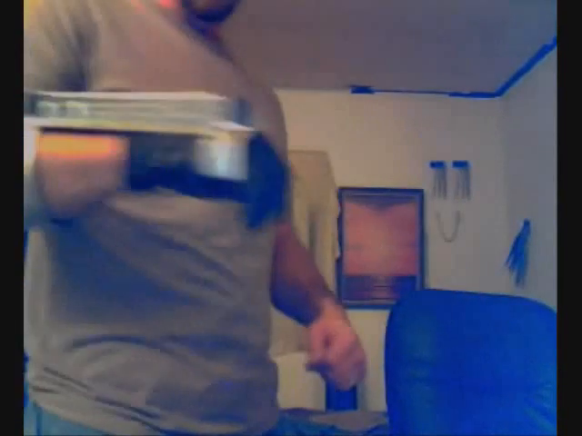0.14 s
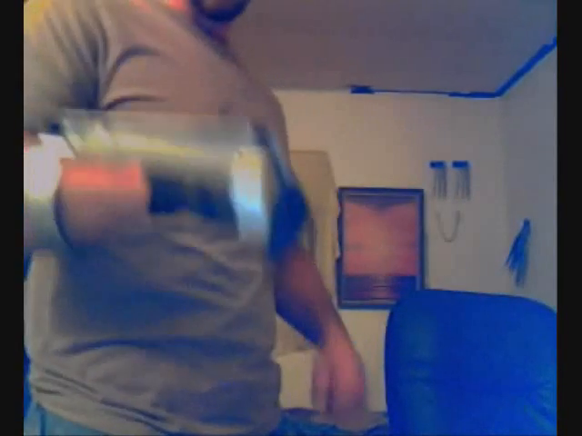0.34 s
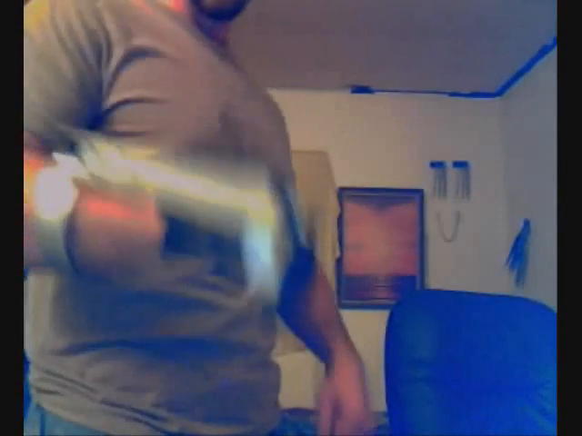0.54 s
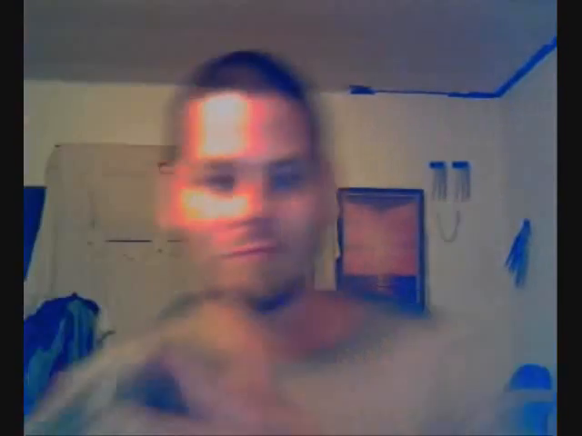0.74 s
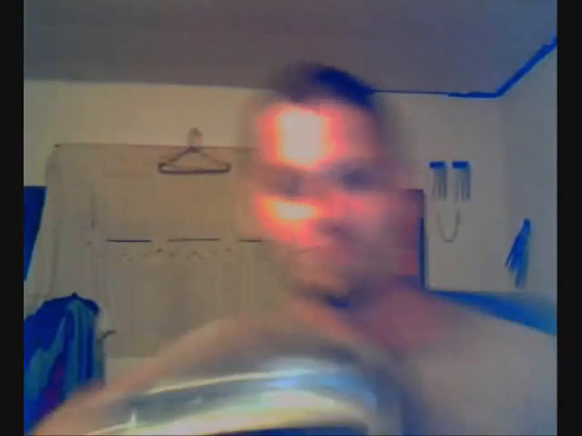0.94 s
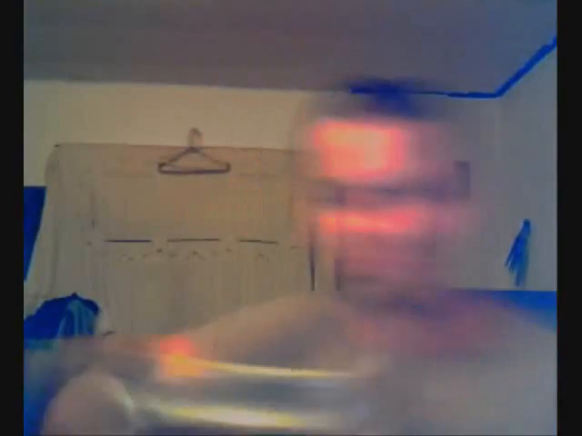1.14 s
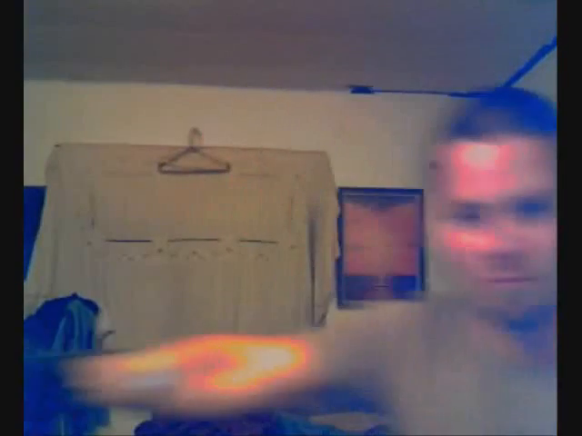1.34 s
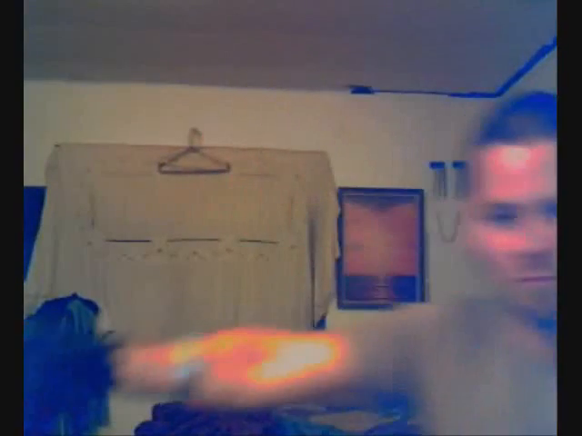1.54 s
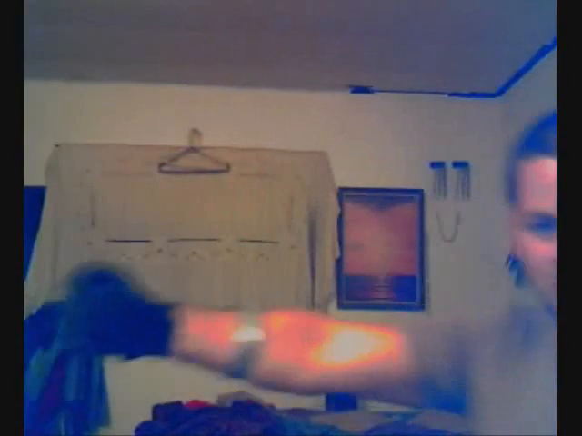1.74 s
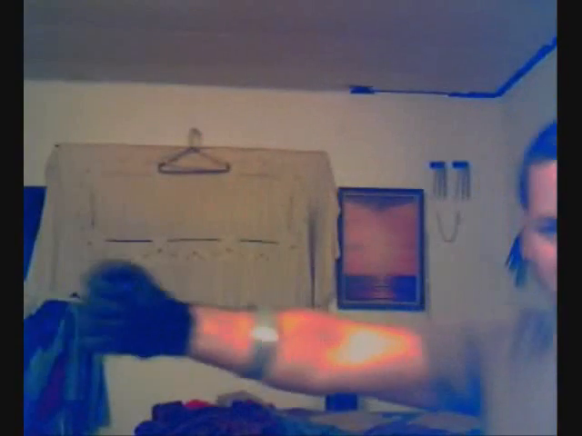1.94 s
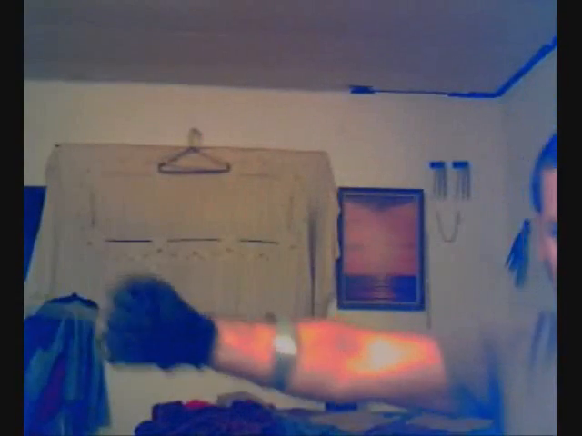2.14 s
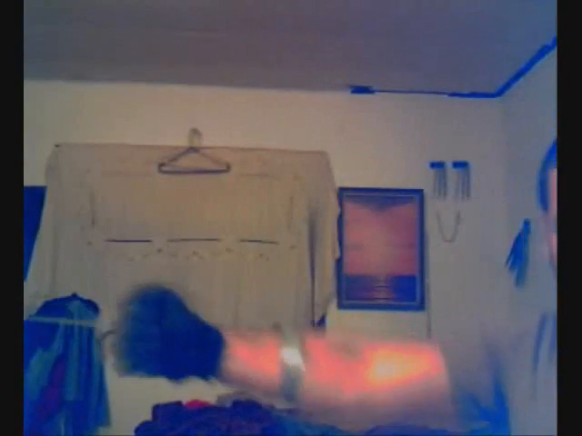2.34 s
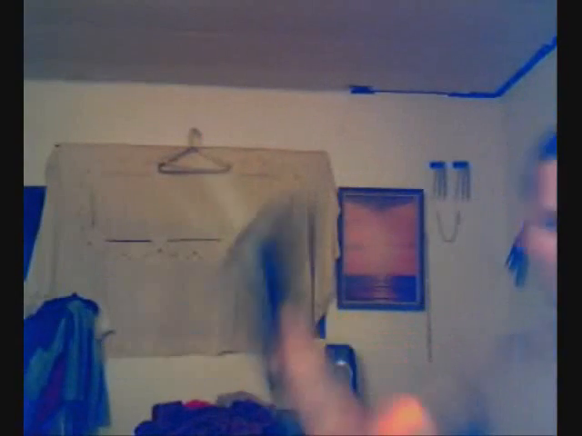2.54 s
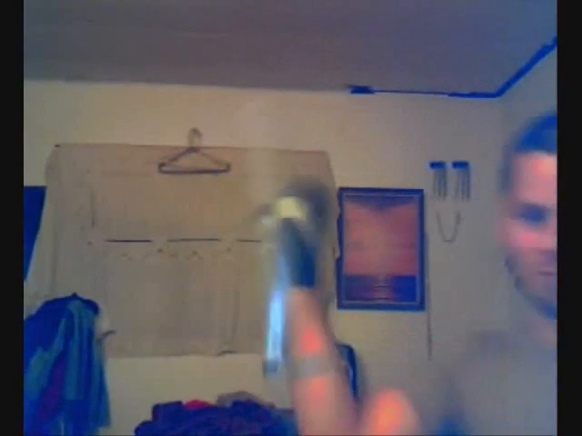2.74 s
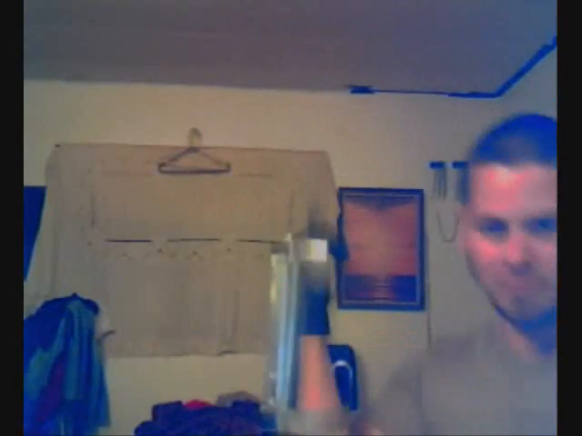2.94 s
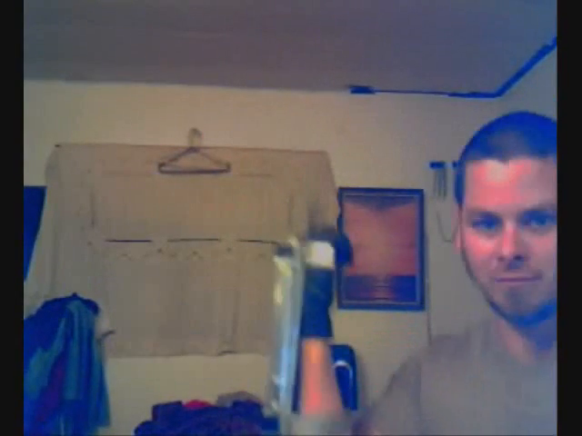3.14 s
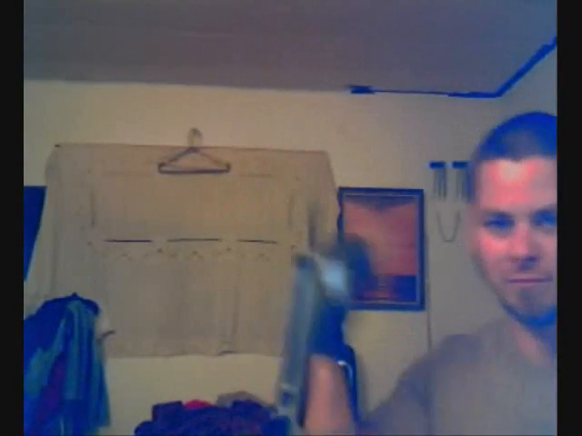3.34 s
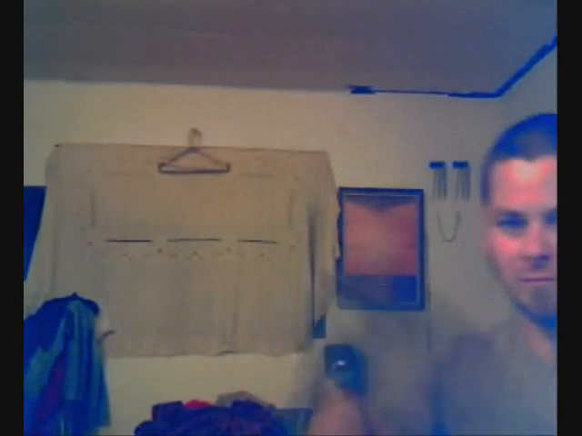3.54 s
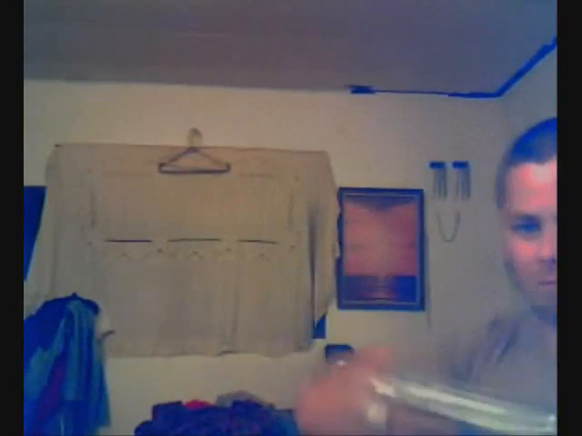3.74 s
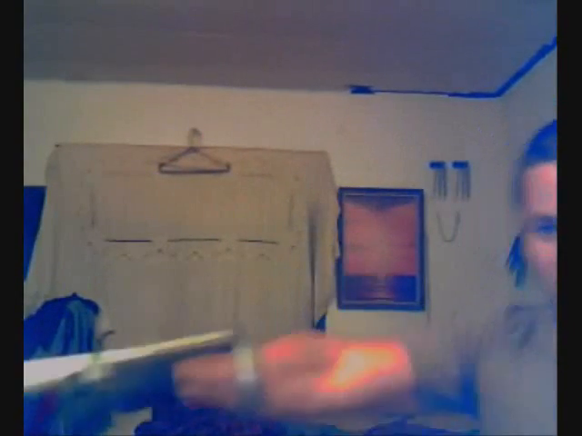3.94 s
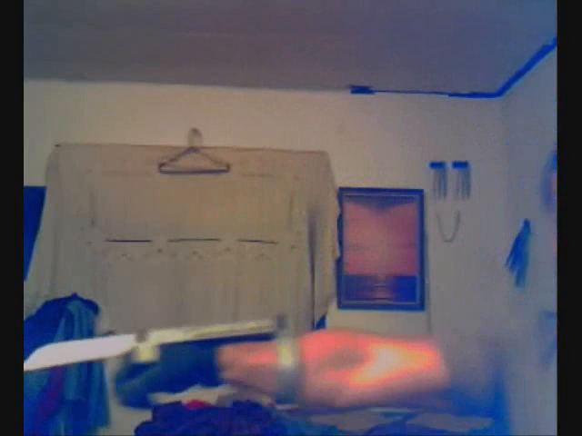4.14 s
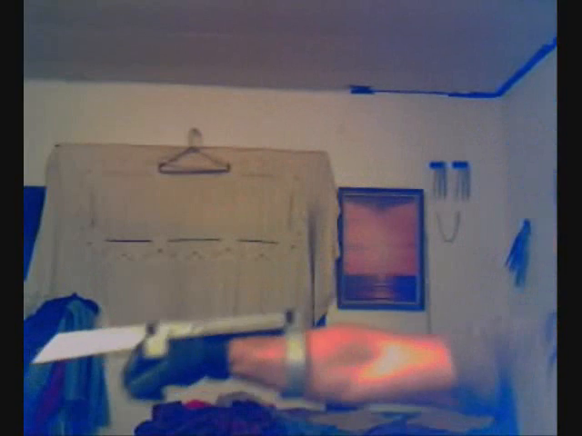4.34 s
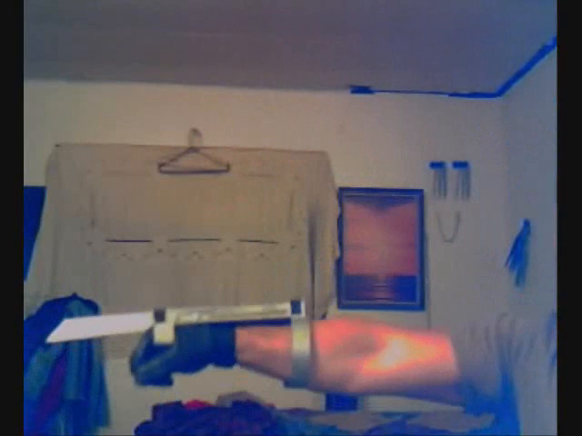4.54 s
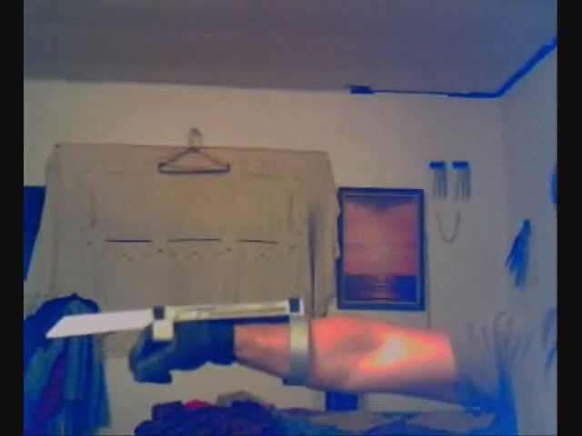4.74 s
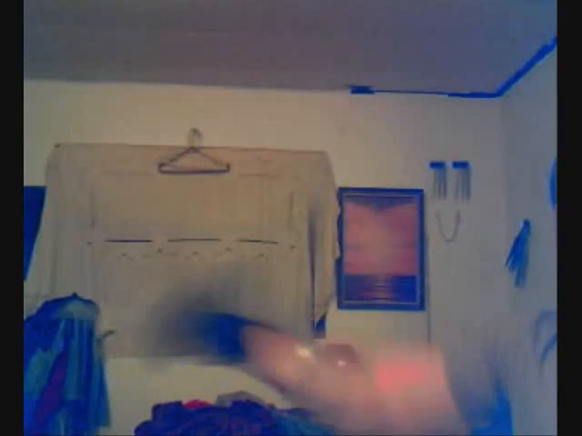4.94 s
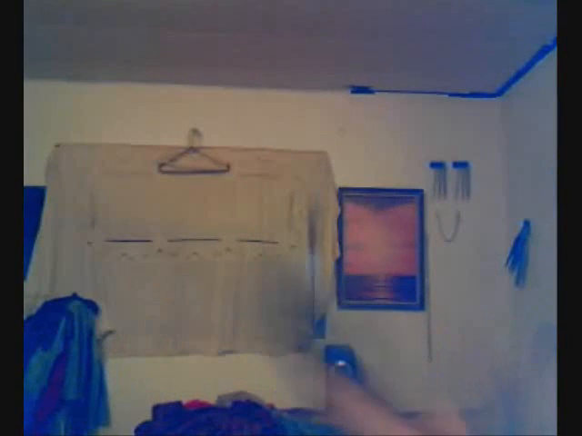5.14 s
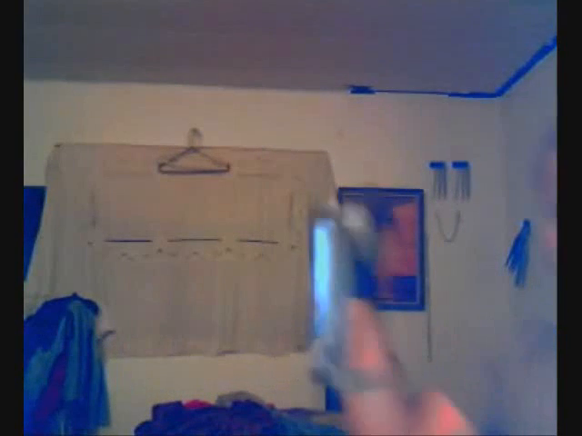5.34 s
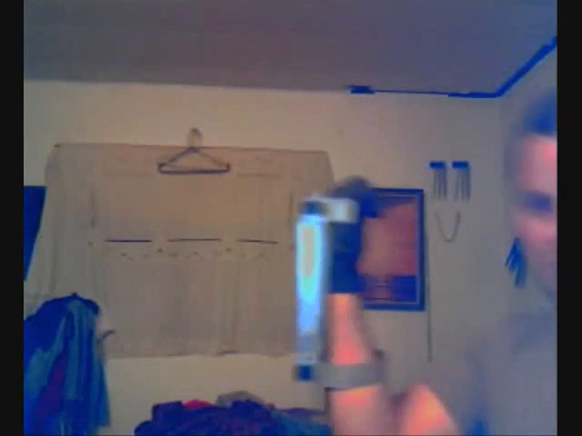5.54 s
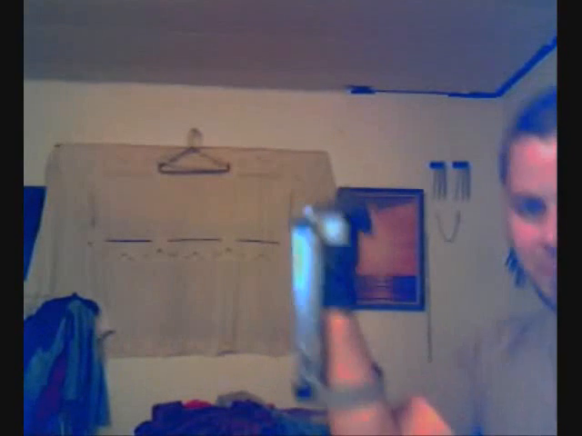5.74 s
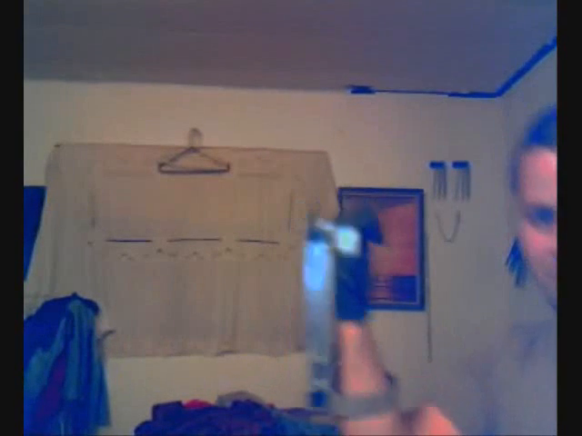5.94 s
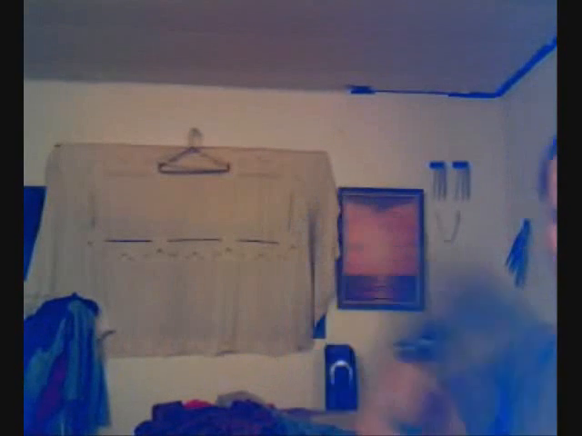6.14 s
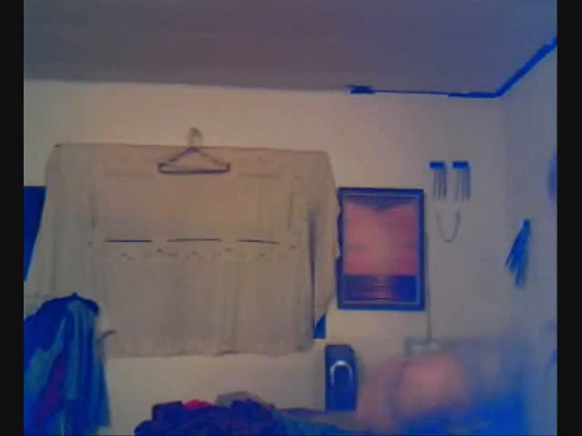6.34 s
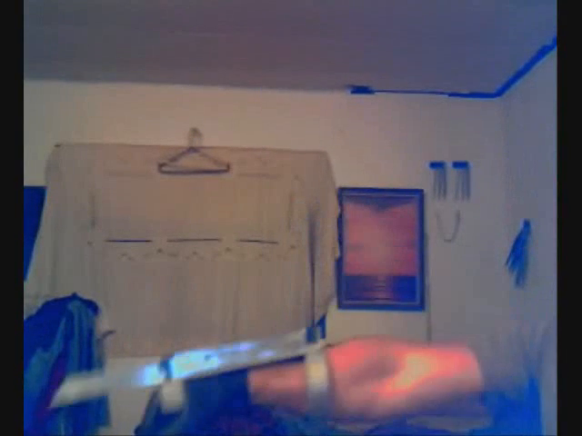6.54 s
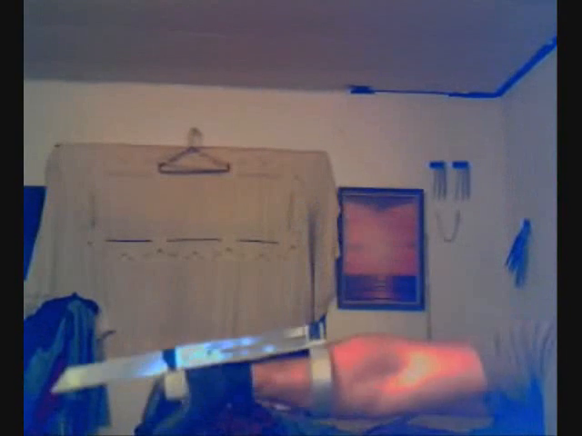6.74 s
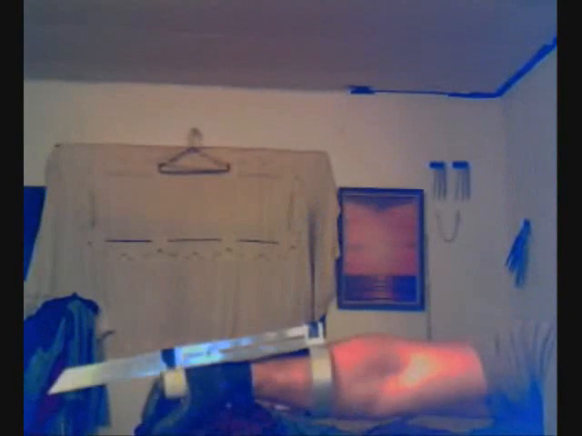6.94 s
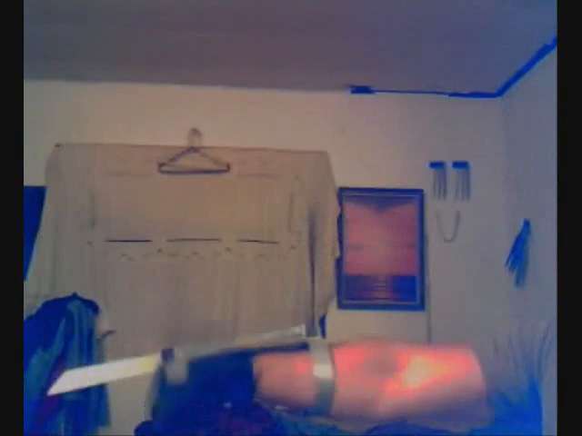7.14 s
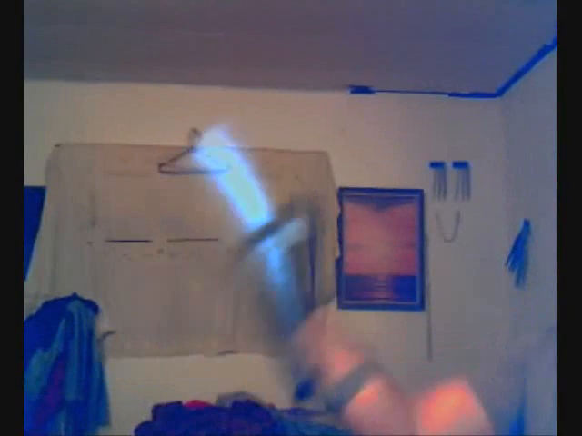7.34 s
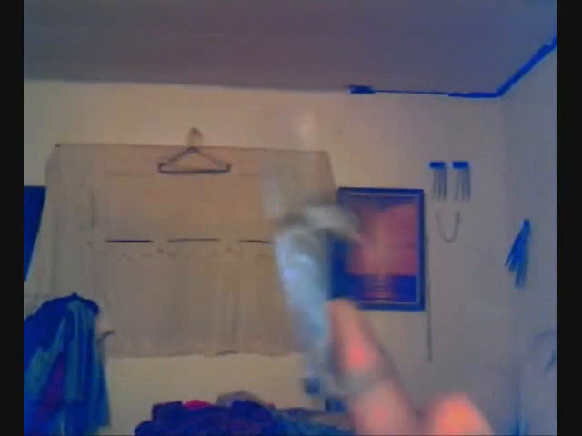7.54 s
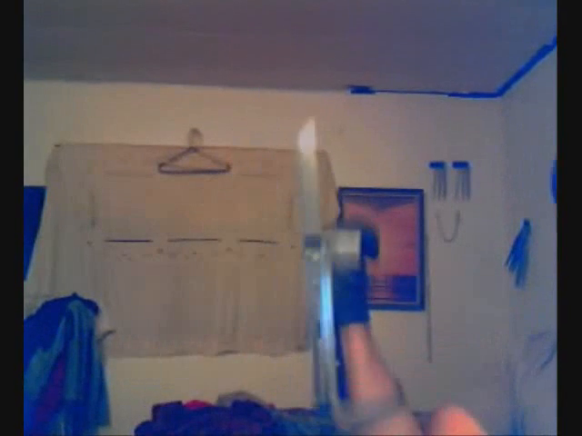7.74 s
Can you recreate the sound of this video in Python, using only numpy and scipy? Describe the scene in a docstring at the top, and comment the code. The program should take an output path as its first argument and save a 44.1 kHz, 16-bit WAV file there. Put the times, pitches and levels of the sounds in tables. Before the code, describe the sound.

Five short harsh metallic slides, out, in, out, in, out, spaced unevenly in a small dry room. Each is a sibilant steel scrape with cracks, ringing treble and a jolting stop, so loud it distorts the cheap close microphone. Faint ticks and a fading low hum come first; sleeve rustles and dull body thuds surround the swings, over steady hiss, rumble and fast-pulsing electronic buzz.

```python
"""A steel blade on a forearm rig is flicked out, in, out, in and out again in a small bedroom.
At first the loose blade only ticks in its guides, over a low hum that fades within the first second.
Then come the swings: cloth brushes, the blade knocks and scrapes along its rails, and stops jolt the rig.
After the last swing it slips back a little and ticks. Rumble, hiss and a faint pulsing buzz lie underneath.
Filtered noise makes the scrapes, knocks and cloth; sines make the tones; tiny microphones ring and overload."""
import sys
import numpy as np
from scipy import signal
from scipy.fft import rfft, irfft
from scipy.io import wavfile
from scipy.ndimage import uniform_filter1d

SR = 44100
rng = np.random.default_rng(int(sys.argv[2]) if len(sys.argv) > 2 else 0)


def generate_wav(signal):
    """Clip the signal to [-1, 1] and save it as 16-bit WAV at the path in sys.argv[1]."""
    frames = np.transpose(np.atleast_2d(signal))
    scaled = np.clip(frames, -1, 1) * 32767
    pcm = np.round(scaled).astype(np.int16)
    wavfile.write(sys.argv[1], SR, pcm)


N = 343980
TIME = np.arange(N) / SR   # seconds


def from_db(db):
    """Turn decibels into a gain."""
    return 10 ** (np.asarray(db) / 20)


def rms_one(x):
    """Scale a sound so its rms level is 1."""
    return x / np.sqrt(np.mean(x ** 2) + 1e-20)


def at_hz(points, hz):
    """Read a table of points between its rows, on a log-frequency axis."""
    point_hz, value = np.array(points).T
    return np.interp(np.log(hz + 1e-9), np.log(point_hz), value)


def cut(x, hz, kind, order=2):
    """Keep only part of the frequency range (Butterworth filter)."""
    return signal.sosfilt(signal.butter(order, hz, kind, fs=SR, output="sos"), x)


def colour(x, spectrum):
    """Shape a steady noise to a spectrum, at rms 1."""
    gain = from_db(at_hz(spectrum, np.fft.rfftfreq(N, 1 / SR)))
    return rms_one(irfft(rfft(x) * gain, N))


def resonance(x, hz, width):
    """Ring at one pitch: a two-pole resonance with gain 1 at its top, its width in Hz."""
    r = np.exp(-np.pi * width / SR)
    feed = np.array([1, 0, -1]) * (1 - r * r) / 2
    feedback = [1, -2 * r * np.cos(2 * np.pi * hz / SR), r * r]
    return signal.lfilter(feed, feedback, x + 1e-18)


def drift(rate):
    """Wander at random between normal draws, with this many new draws per second."""
    points = rng.standard_normal(N // 20)
    return np.interp(TIME * rate, np.arange(len(points)), points)


def pair(alike):
    """White noise as two microphones hear a wide source: partly shared, partly their own."""
    alike = np.clip(alike, 0, 1)
    shared = rng.standard_normal(N)
    own = rng.standard_normal((2, N))
    return np.sqrt(alike) * shared + np.sqrt(1 - alike) * own


def tones(lines):
    """Add up steady sines, each starting at a random point of its cycle."""
    return sum(np.sqrt(2) * from_db(db) * np.sin(2 * np.pi * (hz * TIME + rng.random())) for hz, db in lines)


# The blade shoots out, or slips a little that way.
# Columns: start_s, top_speed_s, friction_db (relative), slowing_db_per_s
SLIDES_OUT = [(.905, .93, -19.5, 208), (.985, 1.078, 6.5, 504), (1.19, 1.228, -26, 600),
              (3.71, 3.8, 6, 497), (3.81, 3.87, -20.5, 184), (6.234, 6.357, 3.5, 545)]
# The blade runs back in, or slips a little that way.
# Columns: start_s, top_speed_s, friction_db (relative), slowing_db_per_s
SLIDES_BACK = [(2.582, 2.6, -24, 600), (2.704, 2.8, 8, 700), (4.97, 5.05, -37, 200), (5.07, 5.14, 5, 380),
               (5.172, 5.194, -8.5, 800), (7.09, 7.133, -26.5, 480)]
# Tone of the friction on the way out. Columns: pitch_hz, level_db (per Hz, relative)
RASP_OUT = [(200, -43), (1200, -21), (2000, -13.5), (3500, -13.5), (5500, -8), (7000, -4), (9000, -4.5),
            (12000, -10), (15500, -2.5)]
# Tone of the friction on the way back. Columns: pitch_hz, level_db (per Hz, relative)
RASP_BACK = [(200, -27.5), (1200, -25.5), (2000, -18), (4000, -18), (5300, -12), (6800, -2), (9000, -9),
             (12000, -12), (15500, -10.5)]


def slide(strokes, spectrum, speed_up, catches_per_s=700, catch_db=-1, chatter_db=2):
    """Steel rubs on steel: fine noise and coarse catches grow with speed, waver with chatter, then die away."""
    friction = 0
    for start, top, db, slowing in strokes:
        gathering = np.interp(TIME, [start, top], [0, 1]) ** speed_up
        dying = from_db(db - slowing * np.maximum(TIME - top, 0))
        friction = friction + gathering * dying
    catches = (rng.random(N) < catches_per_s / SR) * pair(alike=0.26)
    rasp = colour(pair(alike=0.26) + from_db(catch_db) * rms_one(catches), spectrum)
    chatter = from_db(chatter_db * drift(250))   # uneven pressure
    return (friction + 1e-12) * chatter * rasp


# The loose blade knocks in its guides, mostly just before it slides. Columns: start_s, level_db (relative)
KNOCKS = [(0.2662, -19.5), (0.3573, -27.5), (.4973, -32), (0.9205, -5.5), (.932, -16), (.9404, -15),
          (0.9539, 4.5), (1.0207, 1), (2.5693, -24), (2.583, -20), (2.5955, -13), (2.662, -21.5),
          (2.6736, -7), (2.681, -17), (2.8884, -24), (3.6198, -22), (3.6318, -4.5), (3.7, -17.5),
          (3.7244, -5.5), (4.9895, -21), (5.0489, -12.5), (5.0705, -12.5), (5.1894, 5.5), (6.1027, -25),
          (6.1445, -29), (6.182, -29), (6.2477, -8), (6.2682, -5), (6.2833, 3), (6.9396, -30),
          (7.1264, -15.5), (7.6138, -32.5), (7.665, -28.5), (7.6876, -27)]
# Times when the blade sticks out. Columns: start_s, end_s
EXTENDED = [(1.08, 2.8), (3.8, 5.2), (6.36, 7.8)]
# Lower ringing pitches of the frame. Columns: pitch_hz, width_hz, level_db (relative)
FRAME = [(660, 410, -14.5), (1786, 160, -1.5), (2096, 190, 1), (2945, 520, -0.5), (3700, 660, 0),
         (4840, 1300, 0.5)]
# Share of a knock that shakes the frame, before the frame's own gain
STOWED_BODY_DB, EXTENDED_BODY_DB = -17, -31


def knocks(touch_s=0.001214, contact_s=0.001, rattle_s=0.0082, rattle_db=-16):
    """Each knock is a short crack and brief rattle, and shakes the frame, most when the blade is stowed."""
    bright, body = np.zeros((2, N))
    age = TIME[:SR // 20]
    fading = np.exp(-age / contact_s) + from_db(rattle_db) * np.exp(-age / rattle_s)
    shape = (1 - np.exp(-age / touch_s)) * fading
    for s, db in KNOCKS:
        at = round(s * SR)
        sticks_out = any(a < s < b for a, b in EXTENDED)
        body_db = EXTENDED_BODY_DB if sticks_out else STOWED_BODY_DB
        bright[at:at + len(age)] += from_db(db) * shape[:N - at]
        body[at:at + len(age)] += from_db(db + body_db) * shape[:N - at]
    crack = resonance(bright * pair(alike=0.41), hz=7950, width=4600)
    blow = body * pair(alike=0.32)
    frame = 0
    for k, (hz, width, db) in enumerate(FRAME):
        frame = frame + (-1) ** k * from_db(db) * resonance(blow, hz, width)   # signs alternate
    return cut(crack, 4500, "high") + from_db(13.5) * frame


# Ringing pitches of blade and rails. Columns: pitch_hz, level_db (relative to the strongest)
STEEL = [(6611, -35.5), (6686, -38), (6783, -29.5), (7020, -29.5), (7127, -35), (7666, -36.5),
         (7817, -29.5), (7951, -34), (8161, -25.5), (8393, -22.5), (8667, -29), (8931, -46), (9351, -43.5),
         (9609, -44.5)]


def steel(force, ring_db, width_hz=30):
    """Contact noise is heard directly and sets the narrow modes of blade and rails ringing."""
    top_db = max(db for hz, db in STEEL)
    ring = 0
    for k, (hz, db) in enumerate(STEEL):
        ring = ring + (-1) ** k * from_db(db - top_db) * resonance(force, hz, width_hz)   # signs alternate
    return force + from_db(ring_db) * ring


# The blade slams a catch or end stop and jolts the whole rig. Columns: start_s, level_db (relative)
JOLTS = [(0.955, -17), (1.065, -15), (3.8, -24.5), (5.125, -18), (5.186, -8.5), (6.284, -18), (6.356, -18)]
# Tone of a jolt. Columns: pitch_hz, level_db (per Hz, relative)
JOLT = [(100, -7), (300, -2.5), (800, -2), (1300, -10), (2200, -1.5), (4000, -11.5), (8000, -21.5)]


def jolts(rise_s=.001, decay_s=0.0033):
    """The whole rig gives short dull bursts of noise that rise fast and die away."""
    push, age = np.zeros(N), TIME[:SR // 10]
    for s, db in JOLTS:
        at = round(s * SR)
        push[at:at + len(age)] += from_db(db) * (1 - np.exp(-age / rise_s)) * np.exp(-age / decay_s)
    return push * colour(pair(alike=0.21), JOLT)


# Cloth brushes as the arm winds up. Columns: start_s, end_s, level_db (relative)
BRUSHES = [(.862, 0.934, -52), (2.356, 2.46, -48.5), (3.32, 3.49, -45), (4.835, 4.93, -44.5),
           (5.885, 6, -45), (6.178, 6.239, -37), (7.018, 7.12, -39.5)]
# Tone of the cloth. Columns: pitch_hz, level_db (per Hz, relative)
CLOTH = [(200, -10.5), (1500, -10), (4000, -10.5), (8000, -1), (12000, -5), (15500, -4.5)]
# Dull shuffles of the rig against the arm. Columns: start_s, end_s, level_db (relative)
SHUFFLES = [(.862, 1.0, -44.5), (1.12, 1.45, -50.5), (2.46, 2.58, -55), (4.85, 5.06, -56),
            (5.555, 5.61, -48.5)]
# Tone of the shuffles. Columns: pitch_hz, level_db (per Hz, relative)
SHUFFLE = [(150, -4), (600, -2), (1100, -7), (1800, 2.5), (3000, -13.5), (8000, -18.5)]


def rubbing(swells, spectrum, grain_db):
    """Rubbing makes soft grainy swells of noise that start quickly and ebb away."""
    swell = 0
    for a, b, db in swells:
        rise_and_ebb = np.interp(TIME, [a, a + (b - a) / 10, b], [0, 1, 0])
        swell = swell + from_db(db) * np.sqrt(rise_and_ebb)
    grain = from_db(grain_db * drift(150))
    return swell * grain * colour(pair(alike=0.373), spectrum)


# Soft thuds of the moving body. Columns: start_s, pitch_hz, level_db
THUDS = [(.725, 170, -38), (0.866, 59, -31), (0.93, 67, -26), (2.56, 54, -34), (5.309, 44.6, -28),
         (5.41, 40, -33.5)]


def thuds(decay_s=0.011):
    """The moving body gives dull low pushes: sines that swell and die within about a tenth of a second."""
    out = 0
    for s, hz, db in THUDS:
        age = np.maximum(TIME - s, 0)
        swell = age / decay_s * np.exp(1 - age / decay_s)
        out = out + from_db(db) * swell * np.sin(2 * np.pi * hz * age)
    return out


def bedroom(x, t60=0.19, room_db=-7, echo_s=.0056, echo_db=-11):
    """Each microphone hears the direct sound, a near reflection and a diffuse tail of its own."""
    age = TIME[:SR // 2]
    fading = from_db(-60 * age / t60) * (1 - np.exp(-age / 0.0014))
    tail = rng.standard_normal((2, len(age))) * fading
    response = from_db(room_db) * tail / np.sqrt(np.sum(tail ** 2, axis=1, keepdims=True))
    response[:, 0] += 1   # direct sound
    response[:, round(echo_s * SR)] += from_db(echo_db)
    return signal.fftconvolve(x, response, axes=1)[:, :N]


def port_ring(x, hz=8250, width_hz=1700, ring_db=5):
    """The microphone ports resonate in the treble."""
    return x + from_db(ring_db) * resonance(x, hz, width_hz)


# Electronic buzz. Columns: pitch_hz, level_db (rms while a burst sounds)
BUZZ = [(1222, -59.5), (2444, -60.5), (3666, -63.5), (3973, -66), (4888, -68.5), (5197, -65), (6412, -70),
        (10085, -61)]
# Runs of buzz bursts. Columns: start_s, end_s
BUZZ_RUNS = [(0.081, .9), (1.046, 7.8)]
# Faint steady tones. Columns: pitch_hz, level_db (rms)
WHINE = [(900, -72.5), (991, -71), (7634, -77.5), (12403, -84.5)]
# Low hum of the first second. Columns: pitch_hz, level_db (rms before it fades)
HUM = [(37.7, -44.5), (80.7, -49)]
BURST_PERIOD_S, BURST_S = 2 / 15, .03


def electronics():
    """Sines make a buzz in short even bursts, a thin whine, and a hum that soon fades out."""
    bursts = np.zeros(N)
    for a, b in BUZZ_RUNS:
        bursts += (TIME > a) * (TIME < b) * ((TIME - a) % BURST_PERIOD_S < BURST_S)
    hum = tones(HUM) * np.interp(TIME, [.62, .95], [1, 0])
    soft_bursts = uniform_filter1d(bursts, size=90)   # rounds off the edges
    return soft_bursts * tones(BUZZ) + tones(WHINE) + hum


# Tone of the quiet room. Columns: pitch_hz, level_db (per Hz, relative)
QUIET = [(20, -15), (55, -11), (78, -18), (115, -13), (200, -27), (400, -31.5), (600, -35), (1500, -38),
         (3000, -41.5), (6000, -42), (8100, -38.5), (10300, -43.5), (15500, -41)]
# How alike left and right are. Columns: pitch_hz, likeness (0 to 1)
LIKENESS = [(60, 0.88), (130, 0.93), (300, 0.27), (1400, 0.46), (3100, 0.01), (7000, 0), (15000, 0.047)]
# Faint hiss near 8 kHz. Columns: time_s, level_db
FAINT_HISS = [(0, -64.5), (.8, -56), (1.3, -49), (1.85, -60.5), (2.5, -54), (3.1, -61.5), (4.6, -64),
              (5.1, -43.5), (5.65, -56.5), (6.0, -51.5), (6.7, -63), (7.8, -62)]
RUMBLE_DB, AIR_DB, HISS_DB = -48.5, -53.5, -52.5
AIR_FOLLOWS = 0.19   # share of the faint hiss's swing in dB that the airy room noise takes


def background():
    """Filtered noise: steady rumble, airy room noise, a faint swelling hiss and even electronic hiss."""
    faint_db = np.interp(TIME, *np.transpose(FAINT_HISS))
    alike = np.clip(at_hz(LIKENESS, np.fft.rfftfreq(N, 1 / SR)), -1, 1)
    mid, side = rfft(rng.standard_normal((2, N)))
    # The side part has opposite signs left and right
    both = np.sqrt(1 + alike) * mid + np.sqrt(1 - alike) * side * [[1], [-1]]
    noise = colour(irfft(both, N), QUIET)
    rumble = from_db(RUMBLE_DB) * rms_one(cut(noise, 250, "low", order=3))
    air_db = AIR_DB + AIR_FOLLOWS * (faint_db - faint_db.mean())
    air = from_db(air_db) * rms_one(cut(noise, [250, 3000], "band", order=3))
    faint_noise = resonance(rng.standard_normal((2, N)), hz=8170, width=560)
    faint = from_db(faint_db) * rms_one(faint_noise)
    hiss = from_db(HISS_DB) * rms_one(cut(noise, 3900, "high", order=3))
    return rumble + air + faint + hiss


def scene():
    """The rig and sleeve sound in the room; thuds, background and electronics are added on top."""
    out = steel(slide(SLIDES_OUT, RASP_OUT, speed_up=1.59), ring_db=-2.5)
    back = steel(slide(SLIDES_BACK, RASP_BACK, speed_up=1.37), ring_db=-2)
    slides = from_db(-3.5) * (out + back)
    ticks = from_db(5.5) * steel(knocks(), ring_db=-0.5)
    cloth = rubbing(BRUSHES, CLOTH, grain_db=1.0) + rubbing(SHUFFLES, SHUFFLE, grain_db=4.0)
    rig = slides + ticks + jolts() + from_db(-2.0) * cloth
    return port_ring(bedroom(rig)) + thuds() + background() + electronics()


def record(dry, lopsided=0.41, knee=1.8, coupling_hz=14, bend_top_hz=11000, ceiling=0.96, offset=-0.023):
    """Capsules bend loud waves lopsidedly into a low roar and thump; the amplifier clips; the top is cut."""
    bend = cut(np.hypot(dry, knee) - knee, [coupling_hz, bend_top_hz], "band")
    bent = dry - lopsided * bend
    clipped = bent / (1 + (bent / ceiling) ** 6) ** (1 / 6)
    steep_cut = signal.ellip(10, .2, 70, 15620, fs=SR, output="sos")   # low-pass at 15620 Hz
    top_cut = signal.sosfilt(steep_cut, clipped)
    return np.clip(top_cut + offset, -1, 1)


dry = scene()
out = record(dry)
generate_wav(out)
```